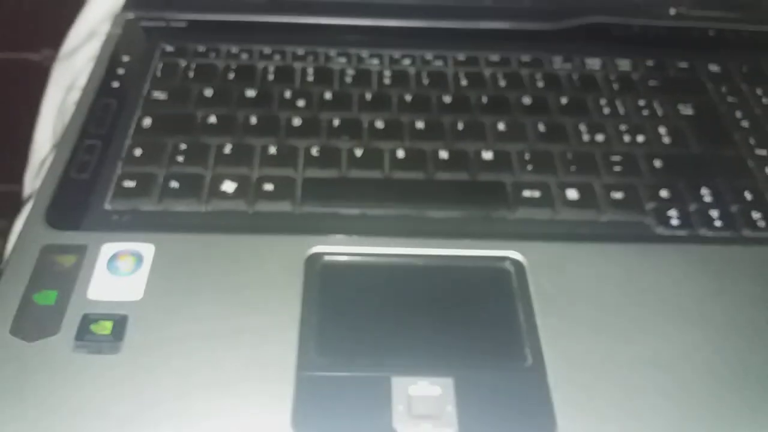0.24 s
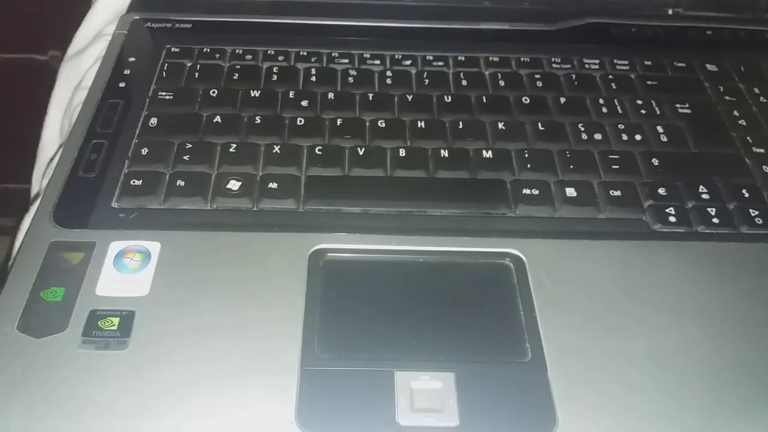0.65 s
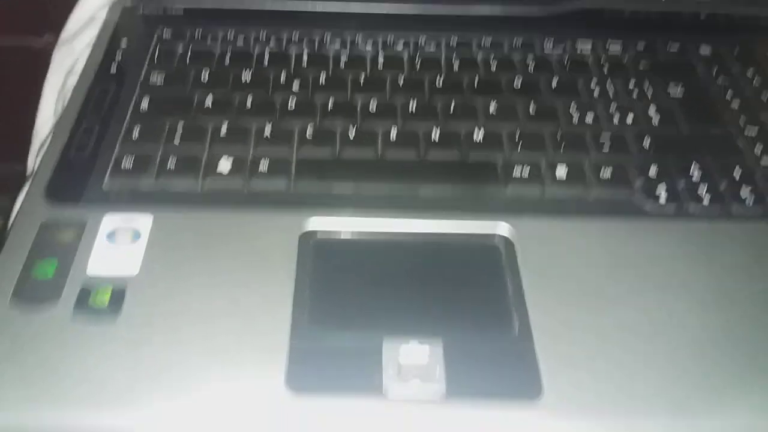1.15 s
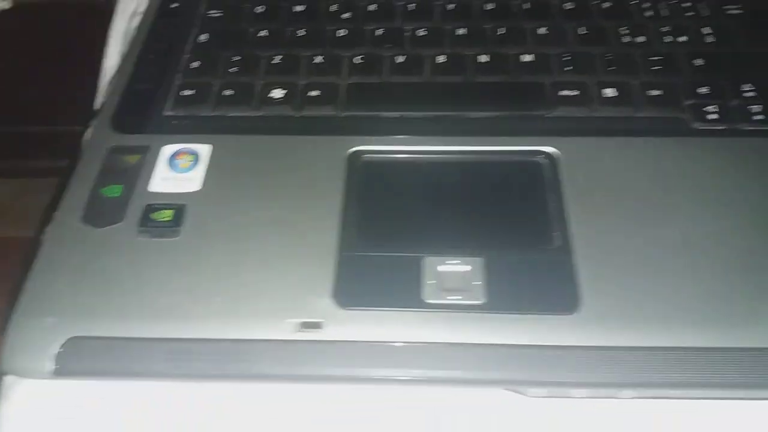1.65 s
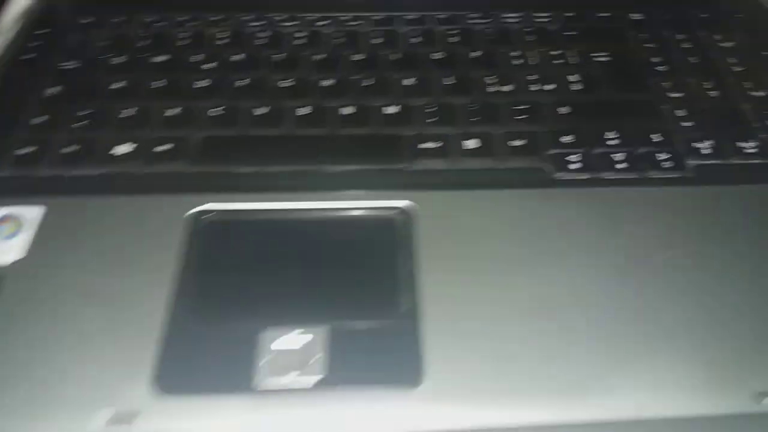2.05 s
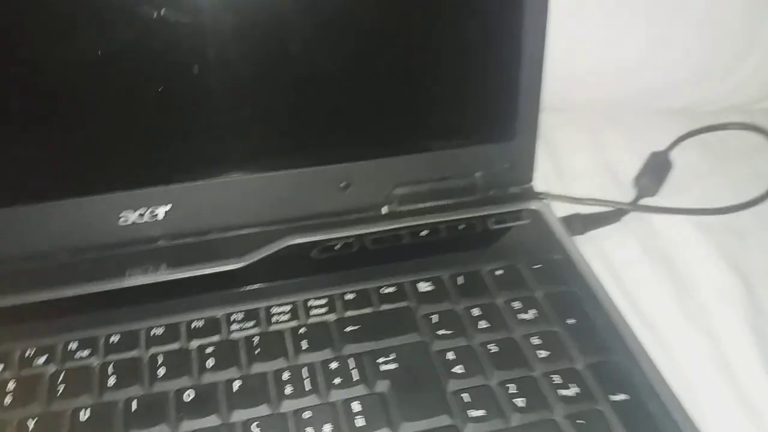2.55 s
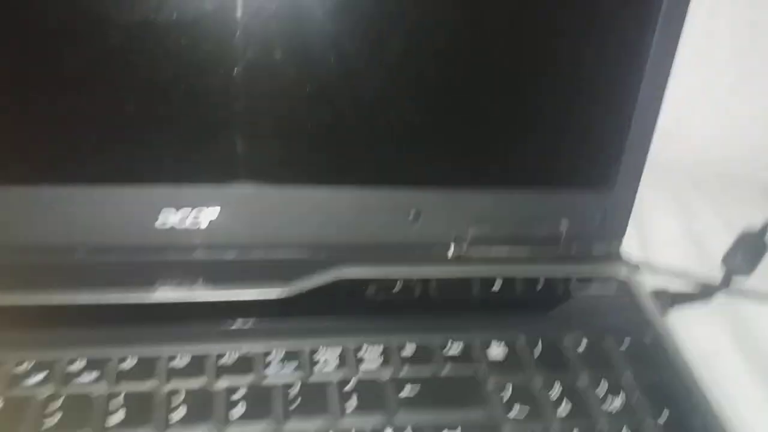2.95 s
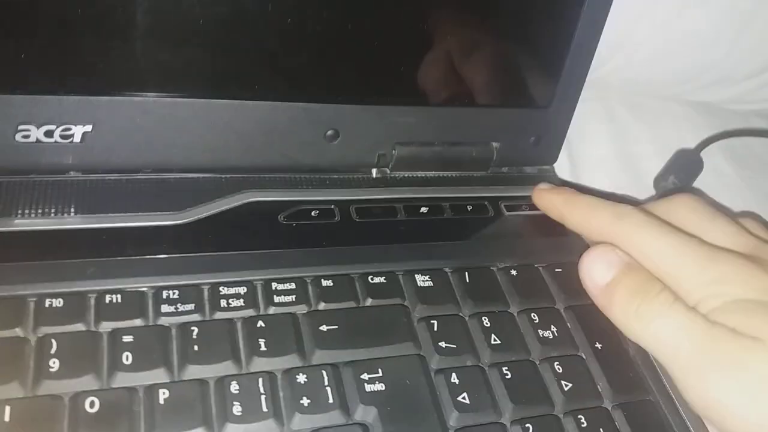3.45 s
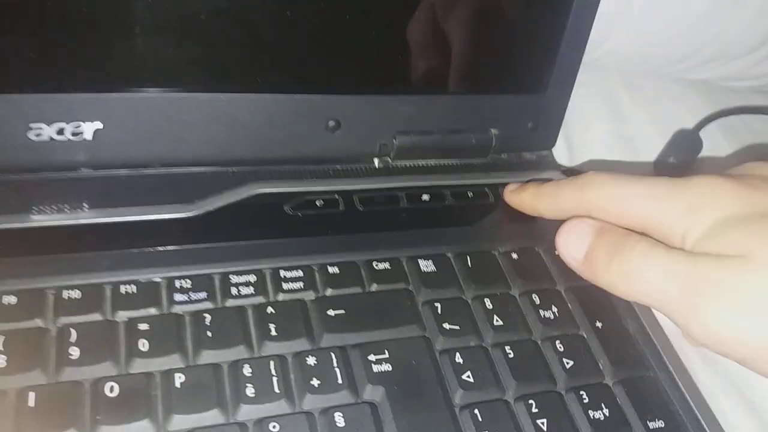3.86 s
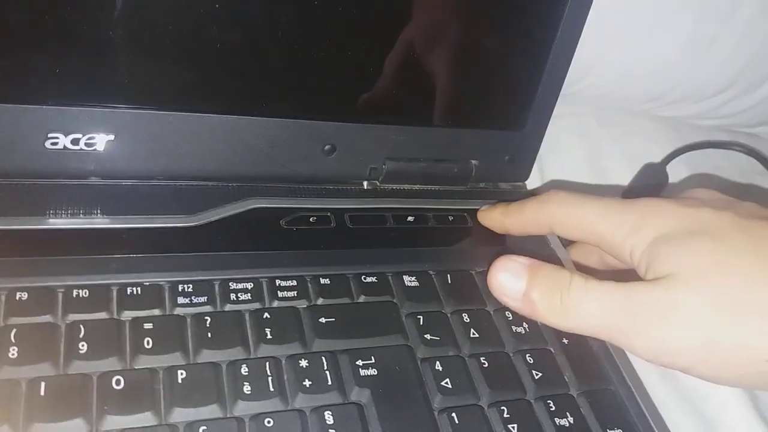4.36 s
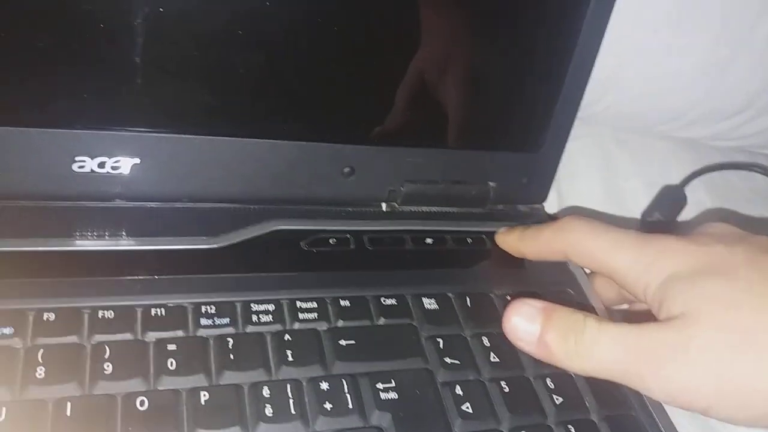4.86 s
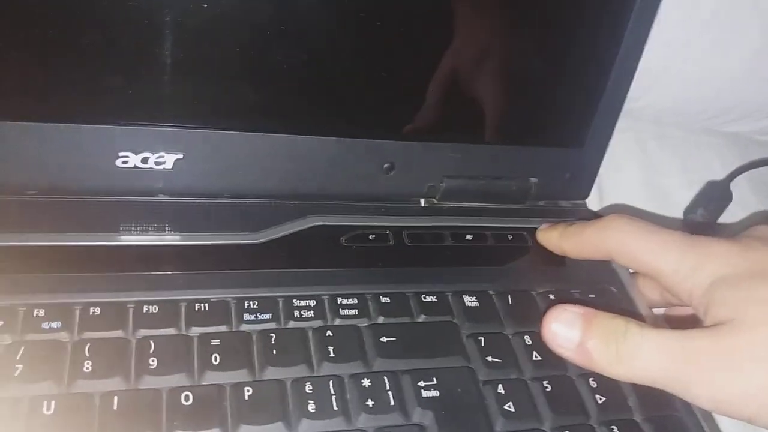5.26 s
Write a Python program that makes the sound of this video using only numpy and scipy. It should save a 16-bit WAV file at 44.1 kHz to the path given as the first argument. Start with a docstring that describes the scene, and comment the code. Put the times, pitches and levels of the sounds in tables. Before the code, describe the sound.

In a quiet room, a very faint low hum and hiss continue while a clock ticks barely audibly each second. At about 1.3 seconds a dull knock and dry crackles come from fingers shifting on the camera housing. From 2.2 to 3.05 seconds the handling becomes denser and louder, with thumps and sharp snaps very close to the microphone. Near 3.95 a small plastic button clicks, with a much fainter release afterwards.

```python
"""A faint, slightly wavering mains hum under rumble and hiss; a wall clock ticks about once a second.
Then fingers shift on the housing of a handheld camera, which crackles, rustles and thumps; later a
faint brief tone, and a button clicks down and up. Hum: a sine. Room, rustle and hand rumble: coloured
noise. Clock: noise bursts through resonances. Button: damped plastic modes with echoes. Thumps and
tone: damped sines of falling pitch. Crackles: groups of short one-cycle pulses with bright edges."""
import sys
import numpy as np
from scipy import signal
from scipy.fft import rfft, irfft, next_fast_len
from scipy.io import wavfile
from scipy.ndimage import uniform_filter1d, map_coordinates

SR = 44100
rng = np.random.default_rng(int(sys.argv[2]) if len(sys.argv) > 2 else 0)


def waveform_to_disk(signal):
    """Save audio, clipped to [-1, 1], as 16-bit WAV at the path in sys.argv[1]."""
    frames = np.transpose(np.atleast_2d(signal))
    scaled = np.clip(frames, -1, 1) * 32767
    samples = np.round(scaled).astype(np.int16)
    wavfile.write(sys.argv[1], SR, samples)


N = 242991

# All levels and gains below are relative within their source unless marked rms.
# Room noise spectrum: freq_hz, gain_db
FLOOR_SPECTRUM = [(20, -3), (35, -6), (60, -0.5), (90, 0), (200, 0.5), (290, 3.5), (340, -5.5), (1480, -10),
                  (4000, -19.5), (7500, -28.5), (10000, -24.5), (12500, -20), (16000, -21)]
# Clock case resonances: centre_hz, width_hz, gain_db
CASE_RESONANCES = [(1884, 400, -8.5), (2610, 120, 1.5), (3150, 90, 3), (3870, 250, -3.5), (4580, 220, -4.5),
                   (5750, 1100, -16)]
# Clock ticks: start_s, level_db
CLOCK_TICKS = [(0.679, -57), (1.681, -59), (2.681, -61), (3.672, -59.5), (4.692, -61.5)]
# Button press, then release: start_s, level_db
BUTTON_CLICKS = [(3.9468, -33.5), (4.229, -53.5)]
# Modes of the button's plastic: freq_hz, press_db, release_db, t60_s
PLASTIC_MODES = [(800, -2, -24.5, 0.022), (1480, -2.5, 4, 0.014), (1794, -0.5, 14.5, 0.0084),
                 (2309, 2, 6, 0.016), (2890, -1, 13, 0.015), (4200, -1.5, -6, 0.02),
                 (4400, -14, -16, 0.068), (4780, -12, -8, 0.018)]
# Early echoes of the button from near walls: delay_s, gain_db
WALL_ECHOES = [(.009, -16), (.0145, -11), (.025, -18)]
# Finger slides: start_s, length_s, rustle_db, rumble_db, crackle_db
FINGER_SLIDES = [(1.28, 0.046, -54, -46.5, -59), (1.381, 0.078, -65.5, -73, -48),
                 (1.449, 0.06, -64, -72, -50.5), (1.924, 0.11, -66, -59.5, -53.5),
                 (2.094, 0.058, -62, -58, -55), (2.171, 0.03, -59.5, -52.5, -54),
                 (2.226, 0.044, -51.5, -47, -58), (2.263, 0.062, -54, -55.5, -39.5),
                 (2.335, .03, -58, -67, -40.5), (2.378, 0.069, -52, -72, -36.5),
                 (2.448, 0.024, -53, -54, -49), (2.485, 0.012, -38.5, -33.5, -29.5),
                 (2.539, 0.02, -50, -62, -40.5), (2.596, .095, -58.5, -54, -58),
                 (2.727, 0.067, -53.5, -63, -47), (2.783, 0.032, -39, -43.5, -30.5),
                 (2.836, 0.093, -48, -48.5, -34.5), (2.956, 0.053, -48.5, -49, -39),
                 (3.01, 0.012, -44, -44.5, -40), (3.354, .085, -73, -58, -63.5)]
# Rustle of sliding skin: freq_hz, gain_db
RUSTLE_SPECTRUM = [(180, -29.5), (300, -10.5), (1140, -8.5), (1250, -9.5), (1580, -7.5), (3400, -9),
                   (8220, -23), (11900, -25.5), (16000, -35)]
# Rumble of the moving hand: freq_hz, gain_db
RUMBLE_SPECTRUM = [(25, -49.5), (60, 7.0), (85, 4.5), (130, -2.0), (300, -9.5), (700, -12.5), (2000, -47.0)]
# Knocks through the housing, and last a faint brief tone near 560 Hz:
# start_s, peak_db, first_pitch_hz, t60_s, pitch_halving_s, contact_tick_db
KNOCKS_AND_TONE = [(1.2788, -20.5, 574, 0.018, 0.1, -66), (1.296, -37, 210, 0.0067, .02, -70),
                   (1.346, -48, 302, 0.016, 0.0088, -75), (2.242, -35.5, 200, 0.046, 0.012, -70),
                   (2.486, -19.5, 168, 0.043, 0.0094, -43), (2.4952, -17.5, 131, 0.019, 0.016, -54.5),
                   (2.501, -24.5, 130, 0.066, 0.0083, -61), (2.614, -39.5, 615, 0.026, 0.037, -52),
                   (2.67, -41, 200, 0.04, 0.028, -70), (2.7527, -25, 895, 0.012, 0.0016, -50),
                   (2.787, -30, 1100, 0.0031, 0.003, -39), (2.8047, -18, 930, 0.0043, 0.0042, -30.5),
                   (2.813, -23.5, 800, 0.0073, 0.0021, -38.5), (2.828, -24.5, 720, 0.0098, 0.0067, -35.5),
                   (2.887, -27, 606, 0.011, 0.0018, -37), (2.97, -18.5, 625, 0.014, 0.00078, -34),
                   (3.0165, -15.5, 637, 0.033, 0.00097, -29), (3.354, -45.5, 217, 0.031, 0.05, -75),
                   (3.705, -60, 559, 0.21, 2.6, -90)]
# Single crackles of skin letting go of the housing, loud and faint: start_s, level_db, pitch_hz
SINGLE_CRACKLES = [(1.2791, -38.5, 1000), (1.3885, -43, 3310), (1.392, -43, 3000), (1.4029, -34.5, 3100),
                   (1.412, -39, 3180), (1.4181, -30.5, 2900), (1.4266, -33.5, 2570), (1.4389, -36, 3060),
                   (1.4405, -34, 3020), (1.4433, -39, 3200), (1.466, -44, 2500), (1.477, -37, 2830),
                   (1.49, -39, 3500), (1.4951, -41, 2680), (1.4993, -37.5, 2620), (1.5038, -30.5, 2800),
                   (1.509, -42.5, 2000), (1.523, -52, 2700), (1.9354, -50, 1930), (2.0981, -41.5, 1660),
                   (2.1134, -39, 2080), (2.2622, -37.5, 1470), (2.2674, -33.5, 3750), (2.2738, -31, 2400),
                   (2.2824, -27, 3040), (2.2872, -24, 3300), (2.2952, -27, 3140), (2.301, -23.5, 3500),
                   (2.312, -36, 2530), (2.322, -33.5, 2880), (2.338, -41, 2500), (2.347, -35.5, 2310),
                   (2.3512, -28.5, 3100), (2.3809, -21.5, 3480), (2.387, -29, 2900), (2.402, -29.5, 2770),
                   (2.4085, -34, 3300), (2.416, -31.5, 3100), (2.4243, -30.5, 2830), (2.4398, -24, 2210),
                   (2.4879, -30, 2900), (2.5506, -19, 3320), (2.558, -36.5, 2600), (2.5624, -36, 1900),
                   (2.5726, -37.5, 1840), (2.6144, -44, 1640), (2.7284, -31, 3020), (2.7394, -35, 1940),
                   (2.7524, -14, 2380), (2.7636, -31.5, 3520), (2.77, -24.5, 3460), (2.7789, -18.5, 3260),
                   (2.7867, -21, 1900), (2.7912, -24, 3300), (2.796, -20.5, 2430), (2.8031, -20.5, 3580),
                   (2.821, -26.5, 2800), (2.8283, -26, 1640), (2.839, -33, 2000), (2.8555, -32.5, 1696),
                   (2.862, -29, 2623), (2.8869, -25, 2170), (2.9071, -22.5, 3500), (2.9171, -10, 2790),
                   (2.929, -34.5, 2812), (2.938, -33.5, 2220), (2.9688, -17.5, 2420), (2.9974, -31.5, 2150),
                   (3.0134, -28, 2330), (3.0171, -15.5, 2220), (3.0233, -29.5, 3060), (3.042, -43.5, 1487)]
# Treble of contact ticks and crackle edges: freq_hz, gain_db
TREBLE_SPECTRUM = [(3500, -20.5), (6000, -50.5), (8000, 2), (10000, 7), (16000, 2.5)]

HUM_HZ, HUM_RMS_DB, FLOOR_RMS_DB = 119.8, -62, -65.5
LOW_CUT_HZ, TOP_HZ, CONVERTER_OFFSET = 36, 15900, -.0005
RISE_DB_PER_S, SAG_DB_PER_S = 798, 38
RUSTLE_FALL_DB_PER_S, RUMBLE_FALL_DB_PER_S = 698.5, 453.5
# Crackles within a slide: median gap, its log spread, size spread, median pitch, pitch spread (20 log10 ratio)
GAP_S, GAP_LOG_SPREAD, SIZE_SPREAD_DB = .006, .6, 3
SLIDE_CRACKLE_HZ, PITCH_SPREAD_DB = 2500, 2.5


def amp(db):
    """Gain of a level in dB."""
    return 10 ** (np.asarray(db) / 20)


def unit(x):
    """x at rms 1."""
    return x / np.sqrt(np.mean(x ** 2) + 1e-20)


def noise(length=N):
    """White Gaussian noise."""
    return rng.standard_normal(length)


def along(points, hz):
    """(freq_hz, value) points interpolated on a log frequency axis."""
    f, v = np.transpose(points)
    return np.interp(np.log(hz + 1), np.log(f + 1), v)


def wobble(knots_per_s):
    """A smooth random curve: a spline through random knots."""
    knots = noise(int(N * knots_per_s / SR) + 4)
    return map_coordinates(knots, [np.arange(N) * knots_per_s / SR])


def filtered(x, response):
    """x times a complex response of frequency."""
    m = next_fast_len(N + SR // 2)
    return irfft(rfft(x, m) * response(np.fft.rfftfreq(m, 1 / SR)), m)[:N]


def coloured(x, spectrum):
    """x through a spectrum of (freq_hz, gain_db) points."""
    return filtered(x, lambda hz: amp(along(spectrum, hz)))


def ring(t, hz, t60_s, attack_s):
    """A damped sine with a soft start."""
    return np.sin(2 * np.pi * hz * t) * amp(-60 * t / t60_s) * (1 - np.exp(-t / attack_s))


def add(track, start_s, sound):
    """Mix a sound into the track, cut at its end."""
    part = track[round(start_s * SR):][:len(sound)]
    part += sound[:len(part)]


def room():
    """A hum of slightly wavering pitch and level over steady rumble and hiss."""
    phase = 2 * np.pi * np.cumsum(HUM_HZ + 0.266 * wobble(6)) / SR
    hum = np.sqrt(2) * amp(HUM_RMS_DB + 1.1 * wobble(6.92)) * np.sin(phase)
    return hum + amp(FLOOR_RMS_DB) * unit(coloured(noise(), FLOOR_SPECTRUM))


def clock():
    """Far ticks, smeared by the room, through the case resonances; the hand settles 0.1 s later."""
    blows, t = np.zeros(N), np.arange(SR // 3) / SR
    for start_s, level_db in CLOCK_TICKS:
        for wait_s, gain_db in [(0, 9.5), (.1, -10.5)]:
            envelope = amp(level_db + gain_db - 60 * t / 0.3) * (1 - np.exp(-t / 0.002))
            add(blows, start_s + wait_s, envelope * noise(len(t)))

    def case(f):
        """Sum of band-pass resonances of alternating sign."""
        total = 0
        for k, (centre, width, gain_db) in enumerate(CASE_RESONANCES):
            bandpass = 1j * f * width / (centre * centre - f * f + 1j * f * width)
            total = total + (-1) ** k * amp(gain_db) * bandpass
        return total

    return filtered(blows, case)


def button():
    """A dome snap rings the plastic briefly and unevenly; near walls repeat it, the room smears it."""
    out, t = np.zeros(N), np.arange(SR // 5) / SR
    for is_release, (start_s, level_db) in enumerate(BUTTON_CLICKS):
        modes = np.zeros(len(t))
        for hz, press_db, release_db, t60_s in PLASTIC_MODES:
            gain = amp((release_db if is_release else press_db) + rng.normal(0, 1))
            unevenness = 1 + 2.6 * uniform_filter1d(noise(len(t)), size=60)
            modes += gain * ring(t, hz, t60_s, attack_s=0.00028) * unevenness
        snap = 1.8 * amp(-60 * t / 0.014) * uniform_filter1d(noise(len(t)), size=3)
        click = modes + snap
        room_response = amp(-37.5 - 60 * t / 0.24) * noise(len(t))
        for delay_s, gain_db in WALL_ECHOES:
            room_response[round(delay_s * SR)] += amp(gain_db)
        add(out, start_s, amp(level_db - 8.0) * click)
        add(out, start_s, amp(level_db - 10.5) * signal.fftconvolve(click, room_response))
    return out


def slide_db(column, fall_db_per_s):
    """Level over time: each slide rises, sags while it lasts and falls away; the loudest counts."""
    t = np.arange(N) / SR
    start_s, length_s, level_db = (np.array(FINGER_SLIDES)[:, [k]] for k in (0, 1, column))
    since = t - start_s
    rise_db = RISE_DB_PER_S * np.maximum(-since, 0)
    sag_db = SAG_DB_PER_S * np.clip(since, 0, length_s)
    fall_db = fall_db_per_s * np.maximum(since - length_s, 0)
    return np.max(level_db - rise_db - sag_db - fall_db, axis=0)


def sliding_grip(spike_db=3, slip_chance=0.036, smooth=0.2):
    """Sliding skin: many tiny uneven slips over some smooth noise; the moving hand rumbles."""
    rustle_db = slide_db(column=2, fall_db_per_s=RUSTLE_FALL_DB_PER_S)
    rumble_db = slide_db(column=3, fall_db_per_s=RUMBLE_FALL_DB_PER_S)
    slips = (rng.random(N) < slip_chance) * amp(spike_db * wobble(150)) * noise()
    rustle = unit(coloured(unit(slips) + smooth * noise(), RUSTLE_SPECTRUM))
    rumble = unit(coloured(noise(), RUMBLE_SPECTRUM))
    # a hand that presses hard rumbles more than it rustles; its rustle is a dull, dense scrape
    press = np.clip((rumble_db - rustle_db + 5.0) / 14, 0, 1)
    dense = amp(2.5 * wobble(200)) * unit(coloured(noise(), RUSTLE_SPECTRUM))
    scrape = unit(filtered(0.47 * rustle + dense, lambda hz: 1 / (1 + (hz / 2500) ** 2)))
    return amp(rustle_db) * ((1 - press) * rustle + press * scrape) + amp(rumble_db) * rumble


def thumps_and_tone():
    """Each knock, and the faint tone, is a damped sine of falling pitch with a bright tick at its start."""
    out, ticks, t = np.zeros(N), np.zeros(N), np.arange(SR // 8) / SR
    for start_s, peak_db, hz, t60_s, halving_s, tick_db in KNOCKS_AND_TONE:
        add(ticks, start_s, amp(tick_db - 60 * t / .0025) * noise(len(t)))
        turns = hz * halving_s * np.log1p(t / halving_s)
        swing = -np.sin(2 * np.pi * turns) * amp(-60 * t / t60_s)
        add(out, start_s, amp(peak_db) * swing / np.abs(swing).max())
    return out + coloured(ticks, TREBLE_SPECTRUM)


def slide_crackles(count=30):
    """Sliding skin lets go repeatedly at uneven gaps; rows as in SINGLE_CRACKLES, silent after the slide."""
    rows = []
    chance = rng.standard_normal((len(FINGER_SLIDES), 3, count))
    for (start_s, length_s, _, _, crackle_db), (gap, size, pitch) in zip(FINGER_SLIDES, chance):
        t = np.cumsum(GAP_S * np.exp(GAP_LOG_SPREAD * gap)) - GAP_S / 2
        level_db = np.where(t < length_s, crackle_db + SIZE_SPREAD_DB * size, -np.inf)
        rows += zip(start_s + t, level_db, SLIDE_CRACKLE_HZ * amp(PITCH_SPREAD_DB * pitch))
    return rows


def crackles(width_cycles=0.27, spread_s=0.001, rest_db=-8, edge_db=-12, duller=0.7):
    """A main slip among six usually weaker ones, each a one-cycle pull; strong ones have duller edges."""
    body, edge, t = np.zeros(N), np.zeros(N), np.arange(-40, 40) / SR
    rows = SINGLE_CRACKLES + slide_crackles()
    chance = rng.standard_normal((len(rows), 7, 5))
    for (main_s, level_db, hz), slips in zip(rows, chance):
        if np.isinf(level_db):
            continue
        for k, (when, size, pitch, bright, lean) in enumerate(slips):
            if k == 0:  # main slip
                start_s, gain, pitch_ratio = main_s, amp(level_db + 4.0), 1
            else:
                start_s = main_s + spread_s * (when + .3)
                gain = amp(level_db + rest_db - 3 * abs(when) + 2.2 * size)
                pitch_ratio = amp(1.5 * pitch)
            cycles = t * hz * pitch_ratio
            pull = -np.cos(2 * np.pi * cycles + 0.75 * lean) * np.exp(-(cycles / width_cycles) ** 2 / 2)
            add(body, start_s + t[0], gain * pull)
            bright_db = edge_db - duller * max(level_db + 26.5, 0) + 3.2 * bright
            edge[round(start_s * SR)] += gain * amp(bright_db) * hz / 2600
    return body + coloured(edge, TREBLE_SPECTRUM)


def scene():
    """All sources at one microphone."""
    return (room() + clock() + button() + sliding_grip() + thumps_and_tone() + crackles())[None]


def record(dry):
    """A steep low cut, nothing from the band limit up, and a small converter offset."""
    def response(hz):
        """Fourth-power high-pass with a sharp upper limit."""
        return (1j * hz / (1j * hz + LOW_CUT_HZ)) ** 4 * (hz < TOP_HZ)

    return CONVERTER_OFFSET + filtered(dry[0], response)[None]


dry = scene()
out = record(dry)
waveform_to_disk(out)
```